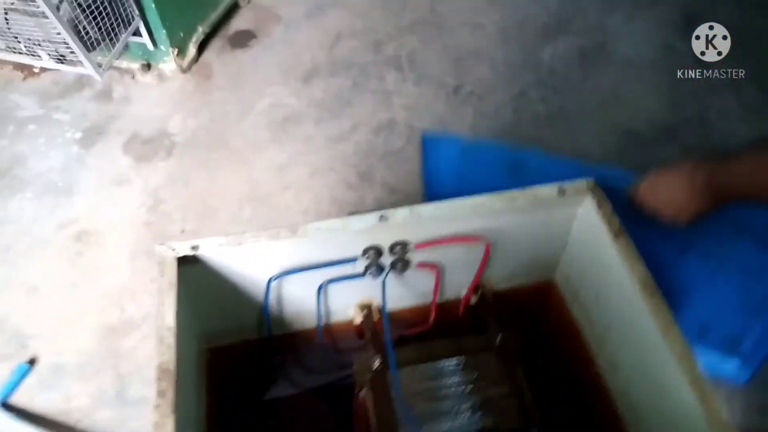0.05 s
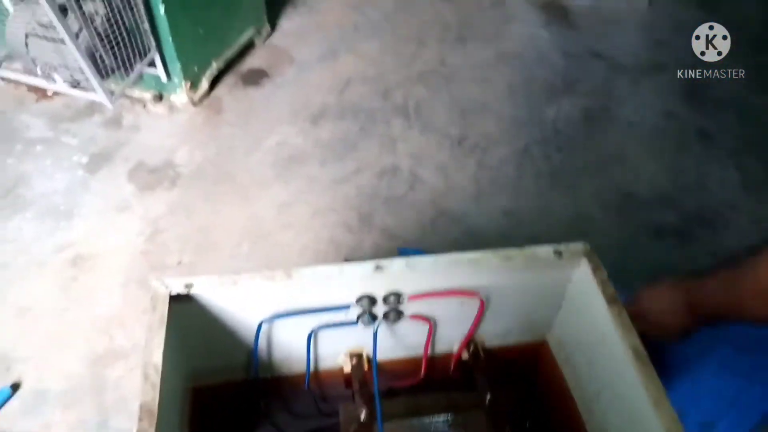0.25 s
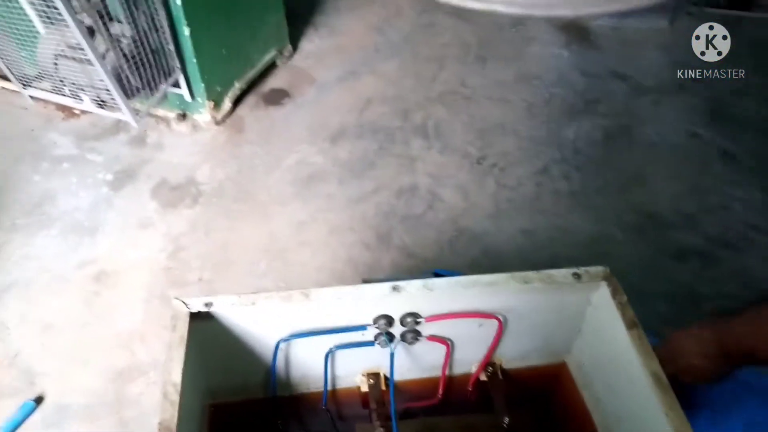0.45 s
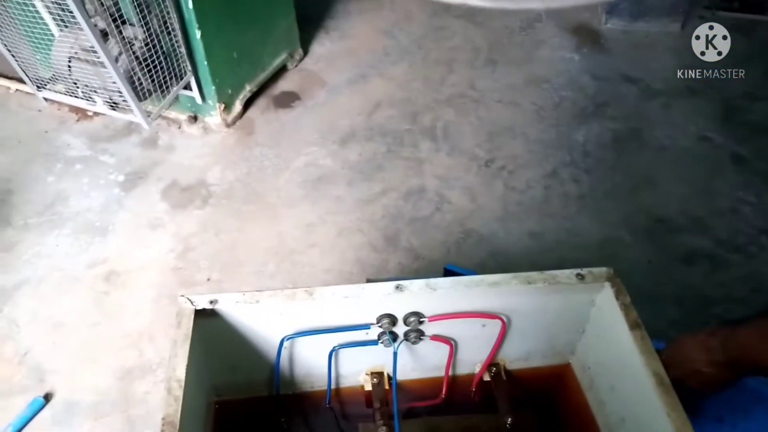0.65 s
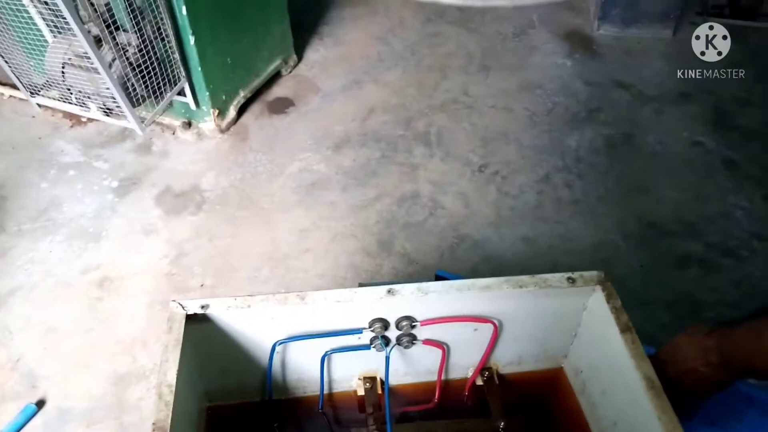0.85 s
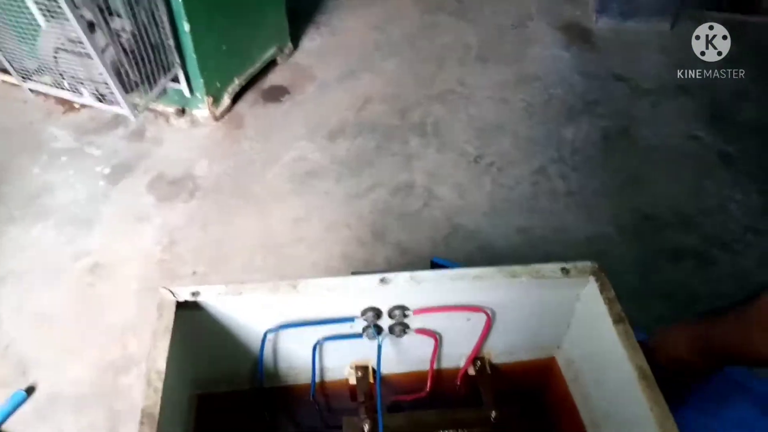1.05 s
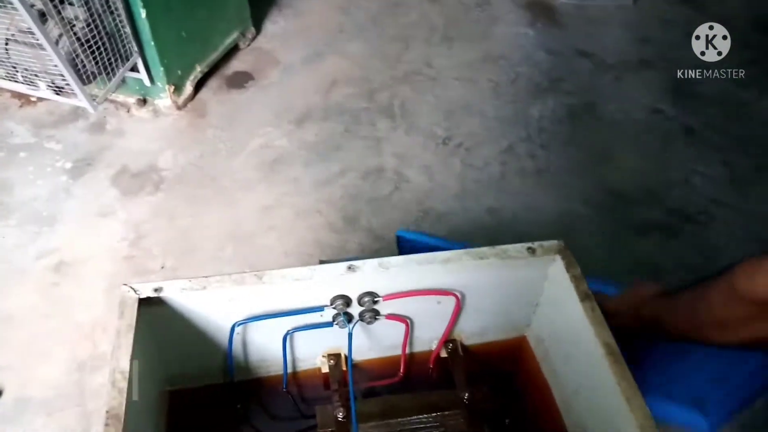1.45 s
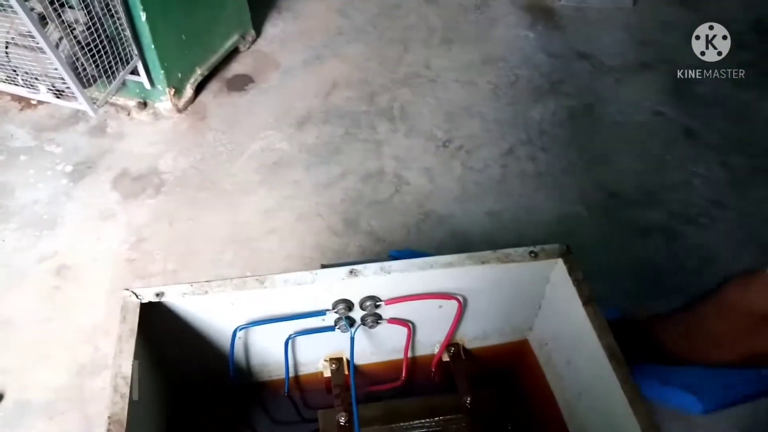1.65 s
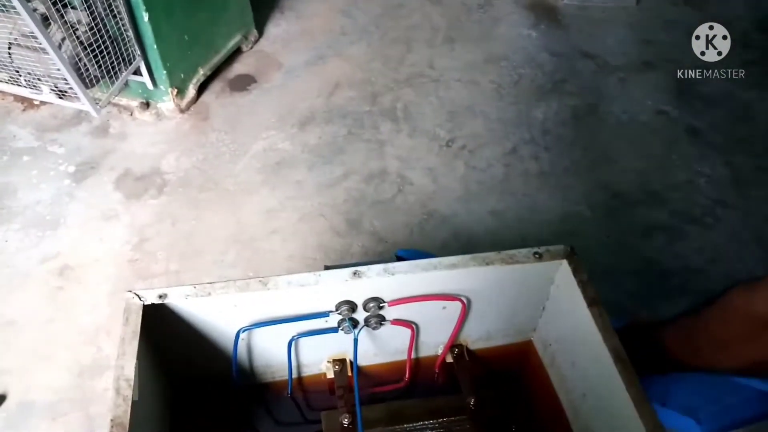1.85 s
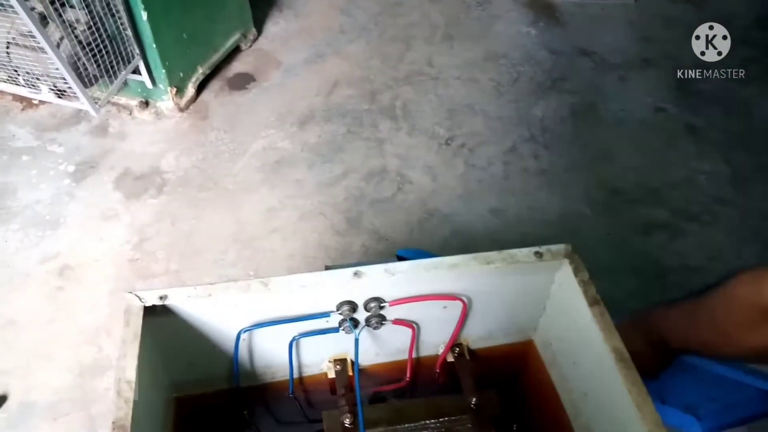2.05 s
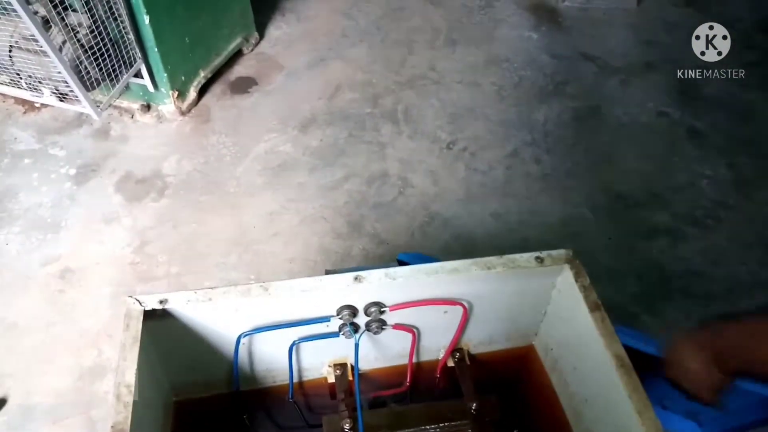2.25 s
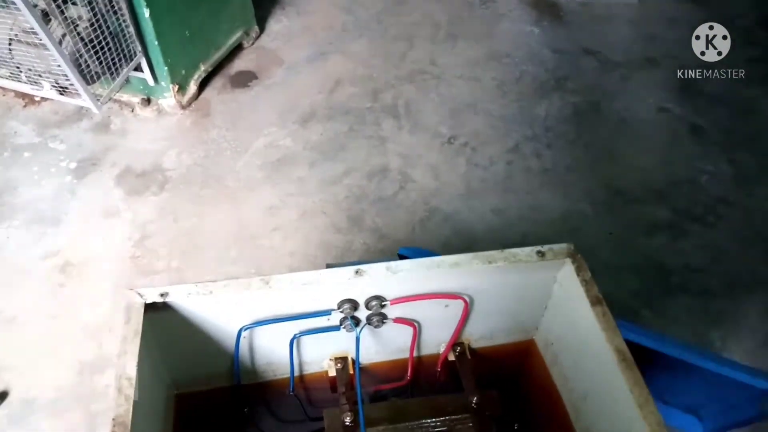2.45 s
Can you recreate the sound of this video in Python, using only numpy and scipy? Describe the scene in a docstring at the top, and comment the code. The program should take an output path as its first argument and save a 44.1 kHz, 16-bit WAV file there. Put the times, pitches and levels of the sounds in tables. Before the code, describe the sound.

Loud booming clangs of a metal sheet set down twice, with a faint scrape between.

```python
"""A faint scrape, then a loud clang: a sheet-steel cover is set down twice on a concrete workshop floor.
Each time one edge strikes and rings, then the sheet lands, booms and rattles; the hall holds the sound
for seconds. In between, the edge drags over grit and clinks against a steel tank. Two small dry clicks
sound close by, over a steady low wash and hum. The steel is made of fading tones (its modes, the pitches
it naturally rings at) and a wash of noise that stands for modes too crowded to tell apart."""
import sys
import numpy as np
from scipy import signal
from scipy.fft import rfft, irfft
from scipy.io import wavfile
from scipy.ndimage import uniform_filter1d

SR = 44100
rng = np.random.default_rng(int(sys.argv[2]) if len(sys.argv) > 2 else 0)


def dump(signal):
    """Clip the signal to [-1, 1] and save it as 16-bit WAV at the path in sys.argv[1]."""
    limited = np.clip(np.atleast_2d(signal).T, -1, 1)
    pcm = np.round(limited * 32767).astype(np.int16)
    wavfile.write(sys.argv[1], SR, pcm)


N = 114660

# A colour says how strong each frequency is. A ring time (t60) is the time to fade by 60 dB.
# colour of the steady low background wash (frequency [Hz], relative level [dB])
BACKGROUND_COLOUR = [(25, -37), (55, -5.5), (100, -5.5), (140, 0.5), (280, 4), (450, 1), (1000, -1.5),
                     (1850, 0.5), (2250, -27.5), (3000, -13), (4200, -12), (5200, -21), (6200, -38),
                     (7500, -26), (10000, -39.5), (15500, -47)]
# how long sheet and hall ring together (frequency [Hz], ring time [s])
HALL_RING_TIMES = [(60, 4.7), (250, 2.41), (700, 2.315), (1700, 1.81), (3000, 1.31), (4500, 1.19),
                   (7500, 0.84), (11000, 0.61), (15500, 0.42)]
# loudness of the dragging edge (time [s], level [dB])
DRAG_LEVELS = [(0, -51.5), (.05, -48.5), (.09, -56), (.22, -65.5), (1.18, -84), (1.29, -60), (1.36, -57),
               (1.43, -48.5), (1.47, -78), (2.6, -101)]
# colour of the dragging as heard through the microphone (frequency [Hz], relative level [dB])
DRAG_COLOUR = [(500, 4), (1700, 8), (2300, -6), (3900, 7), (5000, 4), (6200, -14.5), (7500, -9),
               (10000, -15), (13500, -23), (15300, -10)]
# the edge skips over grains of grit (time [s], level [dB])
GRIT_SKIPS = [(1.265, -68), (1.289, -60.5), (1.313, -59), (1.336, -62), (1.376, -60), (1.405, -59)]
# colour of a skip (frequency [Hz], relative level [dB])
SKIP_COLOUR = [(1500, -28), (2500, -13), (7500, 0), (12000, -12), (15300, -17.5)]
# close dry clicks (time [s], snap level [dB], ring level [dB])
DRY_CLICKS = [(1.5825, -30, -20.5), (2.0704, -17.5, -40)]
# colour of a click (frequency [Hz], relative level [dB])
CLICK_COLOUR = [(400, -35), (1500, -3), (2100, -6), (2700, 0), (4300, 1), (5400, -5), (6400, -10),
                (7400, -5.5), (9000, -8), (9900, -8.5), (11000, -10.5), (12000, -12), (13700, -15),
                (15200, -10)]
# modes of a click (frequency [Hz], relative level [dB], ring time [s])
CLICK_TONES = [(1780, 0, 0.0064), (2700, -0.5, 0.0062), (3760, -8.5, 0.008), (6970, -3, 0.0058),
               (8700, -8, .006), (9500, -6, 0.0063), (11100, -10, 0.0084), (14900, -20, 0.0079)]
# colour of the clink as heard through the microphone (frequency [Hz], relative level [dB])
CLINK_COLOUR = [(1500, -22), (3000, -15.5), (3800, -4), (4150, 2), (4500, -0.5), (5500, -3.5), (6200, -11),
                (7100, -5.5), (9000, -15), (10500, -12), (11400, -12), (13500, -19), (15300, -8.5)]
# modes of the clink (frequency [Hz], relative level [dB], ring time [s])
CLINK_TONES = [(4150, -3.5, .45), (4511, -22, .6), (4700, -14, .6), (5100, -12, .6), (5220, -15, 0.56),
               (6730, -17, .3)]
# sharp touches of a corner (time [s], tail level [dB])
CORNER_TICKS = [(0.2378, -45), (0.3135, -44), (0.5455, -39), (0.6004, -39), (1.441, -48), (1.8102, -36),
                (1.8451, -42)]
# colour of a tick (frequency [Hz], relative level [dB])
TICK_COLOUR = [(2000, -28), (7000, -10), (11500, -9), (13500, -14), (14800, 8), (16000, -2)]
# dull knocks of the sheet's weight (time [s], level [dB], pitch [Hz], ring time [s])
WEIGHT_THUDS = [(0.245, -54, 55.4, 0.37), (0.321, -53, 80, 0.43), (0.317, -28.5, 199, 0.14),
                (0.546, -23.5, 339, 0.13), (0.55, -57, 69, .4), (0.806, -34.5, 277, 0.18),
                (1.794, -43.5, 75, 0.26), (1.871, -31, 243.2, 0.42), (2.395, -39.5, 283.3, .3)]
# the struck edge (time [s], time until damped [s], level [dB], lower pitch [Hz], upper pitch [Hz])
EDGE_STRIKES = [(0.238, 0.045, -28.5, 1560, 1599), (1.7703, 0.056, -35.5, 1557, 1784)]
# strongest modes of the sheet (frequency [Hz], relative level [dB], ring time [s])
SHEET_TONES = [(191.2, -5, 1.95), (245.7, -5.5, 1.1), (282.9, -1.5, 2.66), (366.8, -1, 1.18),
               (443.2, -8.5, 0.73), (527.7, -2.5, 1.84), (699, -10.5, 2.0), (725, -23, 2.5), (913, -3.5, 3),
               (940.4, -0.5, 1.86), (1022, -7, 2.7), (1095, -4, 2.53), (1132, -8, 2.1), (1313, -5.5, 2.5),
               (1575, -4, 2.17), (1609, -6.5, 0.94), (1733, 0.5, 1.42), (1788, -15, 2.1), (1886, -4.5, 1.9),
               (3147, -10.5, 1.45), (4324, -17, 1.55), (4370, -8, 1.5), (5100, -33, 1.2),
               (7400, -14.5, 0.86)]
# colour of the sheet's wash as heard through the microphone (frequency [Hz], relative level [dB])
WASH_COLOUR = [(25, -41), (55, -25.5), (130, -9.5), (200, -1), (300, 3.5), (500, 0), (1000, -2),
               (1500, -1.5), (1870, -1), (2040, -12.5), (2350, -19.5), (3000, -10), (4400, -6.5),
               (5300, -13.5), (6200, -23), (7500, -17), (8100, -21), (9500, -27.5), (13500, -36),
               (15200, -22)]
# blows on the sheet (time [s], bass gain [dB], boom gain [dB], clang gain [dB], sizzle gain [dB],
# rise time [s])
SHEET_BLOWS = [(0.2378, -32, -28, -26.5, -24.5, 0.00035), (0.312, -27, -24, -31, -22, 0.0027),
               (0.466, -37.5, -34.5, -34, -35, 0.0013), (0.545, -31, -38, -32.5, -26, .002),
               (0.6016, -55, -72, -53, -23, 0.00091), (1.7705, -26, -27, -36, -31, 0.0034),
               (1.8082, -30, -36, -29.5, -16, 0.0054), (1.844, -30.5, -47, -27.5, -18, 0.0022)]
# where bass, boom, clang and sizzle lie (frequency [Hz])
BLOW_BANDS = [250, 1200, 4300, 12000]

TIME, FREQUENCIES = np.arange(N) / SR, np.arange(N // 2 + 1) * SR / N  # in s, in Hz


def gain(db):
    """Turn decibels into a number to multiply by."""
    return 10 ** (np.asarray(db) / 20)


def value_at(hz, points):
    """Read between (frequency, value) points, giving every octave the same width."""
    frequencies, values = np.array(points, float).T
    return np.interp(np.log(hz + 1e-3), np.log(np.sort(frequencies)), values)


def tint(sound, colour):
    """Turn each frequency up or down to follow a colour."""
    return irfft(rfft(sound) * gain(value_at(FREQUENCIES, colour)), N)


def noise(colour):
    """Coloured noise with a strength of one."""
    hiss = tint(rng.standard_normal(N), colour)
    return hiss / hiss.std()


def fade(start, t60, rise=0.00012):
    """A quick rise at the start, then a smooth dying away."""
    age = np.maximum(TIME - start, 0)
    return -np.expm1(-age / rise) * np.exp(-np.log(1000) * age / t60)


def tone(hz, start=0):
    """A pure tone with a strength of one, passing through zero at the start."""
    return np.sqrt(2) * np.sin(2 * np.pi * hz * (TIME - start))


def drift(first_span, second_span):
    """A random wobble: noise smoothed twice, over spans counted in samples."""
    wobble = uniform_filter1d(uniform_filter1d(rng.standard_normal(N), first_span), second_span)
    return wobble / wobble.std()


def crowded_modes(spread_db=2, t60=0.055):
    """The steel's random peaks and dips over frequency; a longer t60 makes them narrower."""
    ripple = rfft(rng.standard_normal(N) * fade(0, t60)).real
    peaks = gain(spread_db * ripple / ripple.std())
    return peaks / np.sqrt(np.mean(peaks ** 2))


def steel_noise(colour, peaks):
    """Coloured noise passed through the sheet's crowded modes."""
    return irfft(rfft(noise(colour)) * peaks, N)


def bursts(touches, colour, t60, rise):
    """Each touch makes a short burst of noise."""
    return noise(colour) * sum(gain(db) * fade(start, t60, rise) for start, db in touches)


def background():
    """A steady low wash, like an earlier bang lingering in the hall, and an electrical hum."""
    return gain(-50.5) * noise(BACKGROUND_COLOUR) + gain(-61.5) * tone(hz=98.5)


def hall_tail(sound, start, rise=0.0016):
    """A sound dies away in the hall, band by band, the treble first."""
    out, spectrum = 0, rfft(sound)
    centres, ring_times = zip(*HALL_RING_TIMES)
    for weights, t60 in zip(np.eye(len(centres)), ring_times):
        band = irfft(spectrum * value_at(FREQUENCIES, list(zip(centres, weights))), N)
        out += band * fade(start, t60, rise)
    return out


def edge_drag(peaks, roughness_db=1.5):
    """The edge catches, slips and skips on gritty concrete."""
    level_db = np.interp(TIME, *np.array(DRAG_LEVELS).T) + roughness_db * drift(300, 120)
    rub = steel_noise(DRAG_COLOUR, peaks) * gain(level_db)
    return rub + bursts(GRIT_SKIPS, SKIP_COLOUR, t60=0.12, rise=0.0014)


def dry_clicks(snap_t60=0.0095, echo_delay_s=0.023, bass_cut_hz=1100):
    """A snap with very short modes, one echo and a little hall; so small a thing gives off no bass."""
    out = 0
    for start, snap_db, ring_db in DRY_CLICKS:
        echo = gain(-14.5) * fade(start + echo_delay_s, snap_t60)
        snap = noise(CLICK_COLOUR) * (fade(start, snap_t60) + echo)
        ring = sum(gain(db) * tone(hz, start + rng.random() / hz) * fade(start, t60)
                   for hz, db, t60 in CLICK_TONES)
        hall = gain(max(snap_db, ring_db) - 30.5) * hall_tail(noise(CLICK_COLOUR), start)
        out += gain(snap_db) * snap + gain(ring_db) * ring + hall
    return signal.sosfilt(signal.butter(2, bass_cut_hz, "high", fs=SR, output="sos"), out)


def tank_clink(peaks, start=1.441):
    """The edge meets the tank: a bright touch, high ringing modes and their echo in the hall."""
    touch = steel_noise(CLINK_COLOUR, peaks) * fade(start, t60=0.22, rise=0.00079)
    ring = sum(gain(db) * tone(hz, start) * fade(start, t60) for hz, db, t60 in CLINK_TONES)
    hall = hall_tail(steel_noise(CLINK_COLOUR, peaks), start)
    return gain(-35.5) * (touch + gain(-6.5) * (ring + hall))


def corner_ticks():
    """A corner touches: a hard snap and a short bright tail."""
    tail = bursts(CORNER_TICKS, TICK_COLOUR, t60=0.078, rise=0.0003)
    snap = bursts(CORNER_TICKS, TICK_COLOUR, t60=0.02, rise=0.0003)
    return tail + gain(9.5) * snap


def thuds():
    """The sheet bends under its weight: one short low tone in a puff of rumble."""
    out = 0
    for start, db, hz, t60 in WEIGHT_THUDS:
        rumble = noise([(hz / 4, -40), (hz / 2, -12), (hz, 0), (hz * 2, -12), (hz * 10, -70)])
        out += gain(db) * (tone(hz, start) + gain(-11.5) * rumble) * fade(start, t60, rise=0.0055)
    return out


def edge_ring(damping_s=0.014):
    """Two modes of the struck edge throb against each other until the landing stops them."""
    out = 0
    for start, length, db, low_hz, high_hz in EDGE_STRIKES:
        pair = tone(low_hz, start) + gain(-5) * tone(high_hz, start)
        since_landing = np.maximum(TIME - start - length, 0)
        out += gain(db) * pair * fade(start, t60=1.3) * np.exp(-since_landing / damping_s)
    return out


def sheet_ring(waver_hz=14, waver_db=3, waver_radians=0.7):
    """Each blow adds energy to the strong modes, which waver as the hall's echoes overlap."""
    out, span = 0, int(SR / waver_hz)
    for hz, db, t60 in SHEET_TONES:
        energy = 0
        for start, *band_dbs, rise in SHEET_BLOWS:
            strength = gain(value_at(hz, list(zip(BLOW_BANDS, band_dbs))))
            energy += (strength * fade(start, t60, rise)) ** 2
        phase = 2 * np.pi * hz * TIME + waver_radians * drift(span, span // 2)
        level_db = db + waver_db * drift(span, span // 2)
        out += gain(level_db) * np.sqrt(2 * energy) * np.sin(phase)
    return gain(-14.5) * out


def sheet_crash(peaks):
    """Each blow sends a crack straight to the ear and leaves a long wash of noise in the hall."""
    out = 0
    for start, *band_dbs, rise in SHEET_BLOWS:
        blow_colour = list(zip(BLOW_BANDS, band_dbs))
        wash = tint(steel_noise(WASH_COLOUR, peaks), blow_colour)
        crack = tint(noise(WASH_COLOUR), blow_colour) * fade(start, t60=0.03, rise=rise)
        out += hall_tail(wash, start, rise) + gain(5) * crack
    return out


def scene():
    """Add all the sounds together in one channel."""
    peaks = crowded_modes()
    landings = sheet_crash(peaks) + sheet_ring() + edge_ring() + thuds() + corner_ticks()
    return (landings + tank_clink(peaks) + dry_clicks() + edge_drag(peaks) + background())[None]


def record(dry):
    """Cut away the very highest treble."""
    top_hz = 15500
    return signal.sosfilt(signal.ellip(14, .2, 75, top_hz, fs=SR, output="sos"), dry)


dry = scene()
out = record(dry)
dump(out)
```